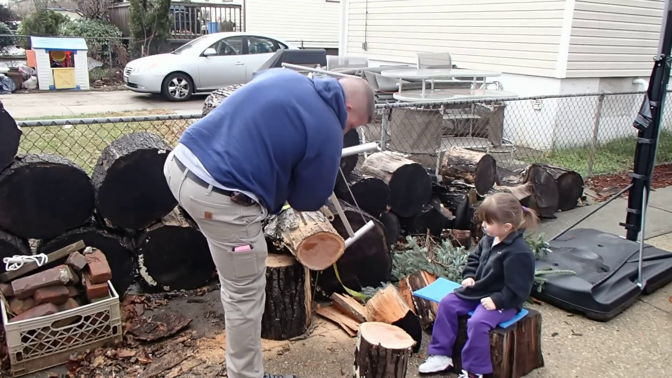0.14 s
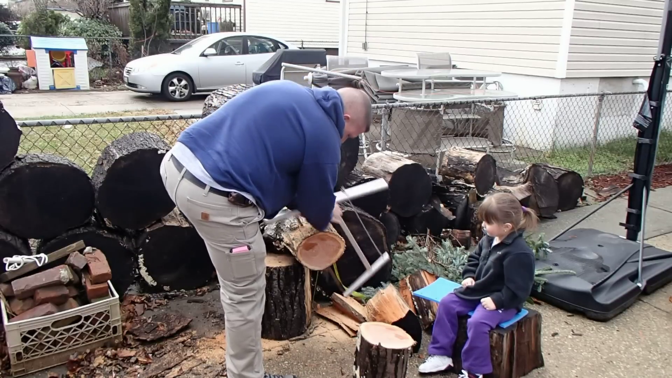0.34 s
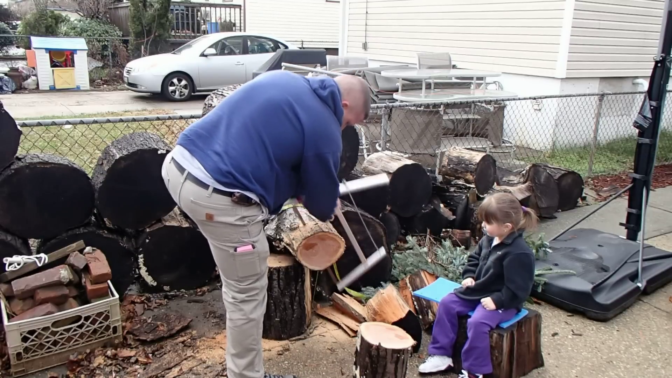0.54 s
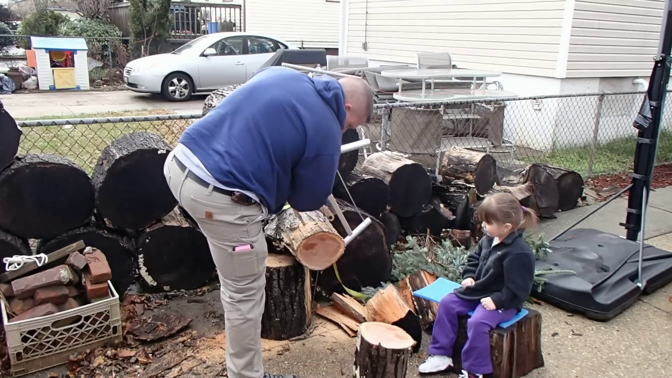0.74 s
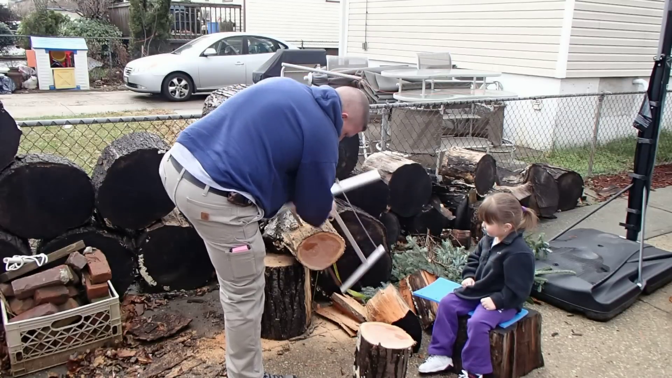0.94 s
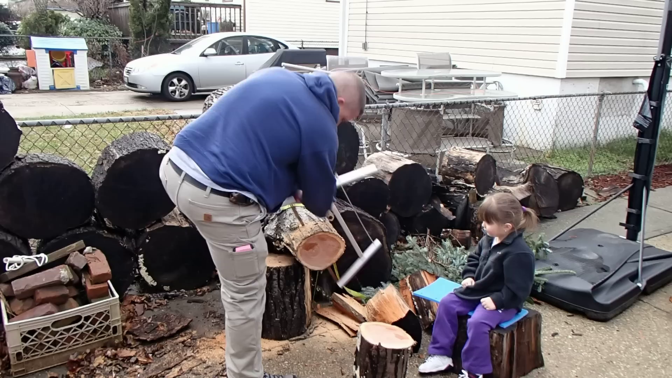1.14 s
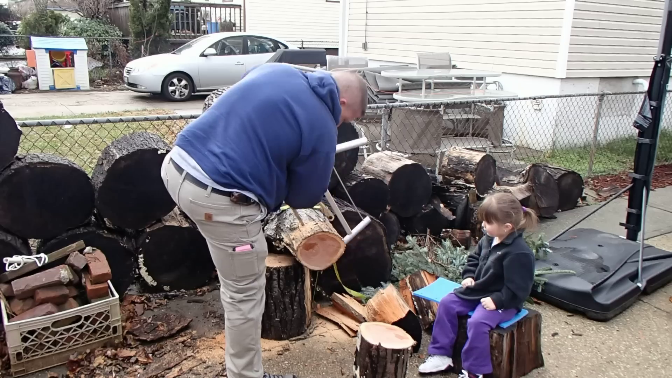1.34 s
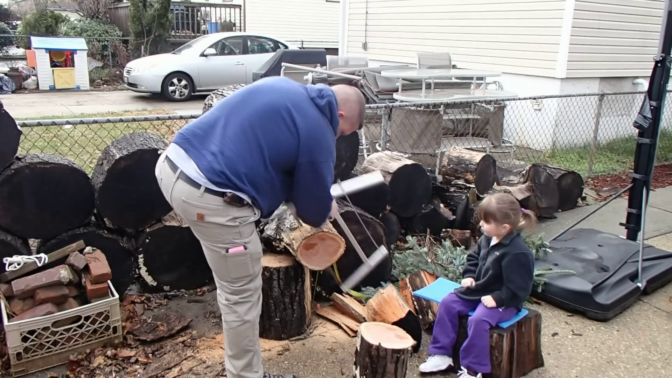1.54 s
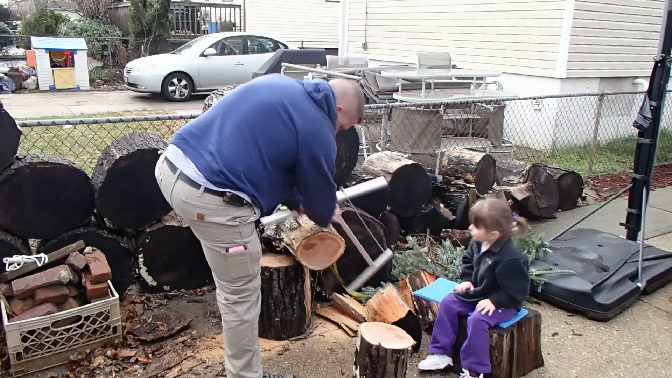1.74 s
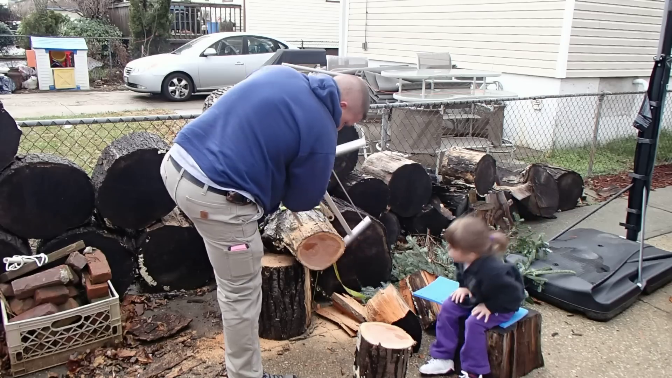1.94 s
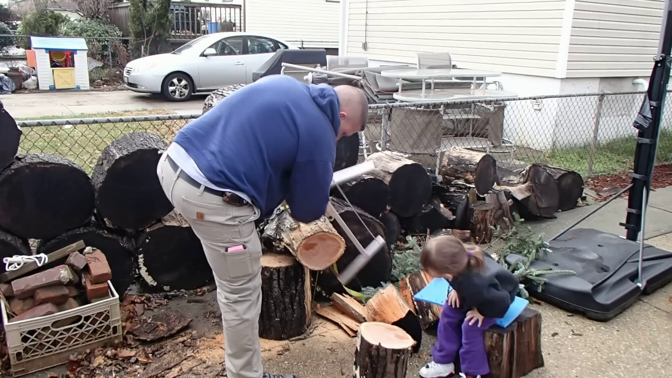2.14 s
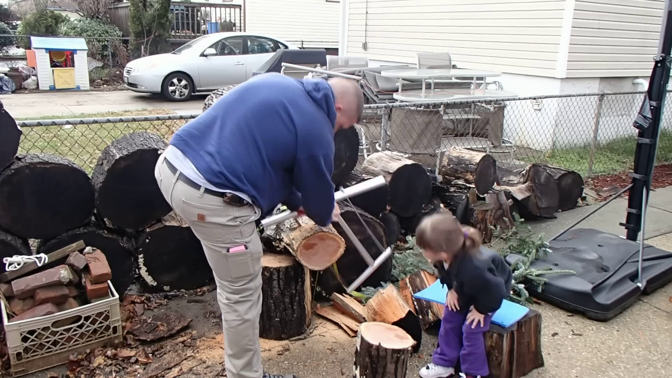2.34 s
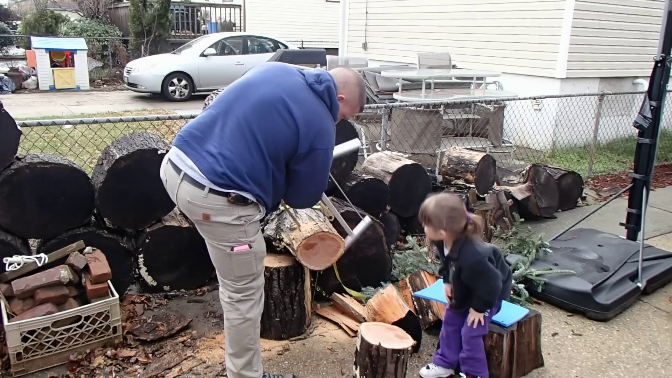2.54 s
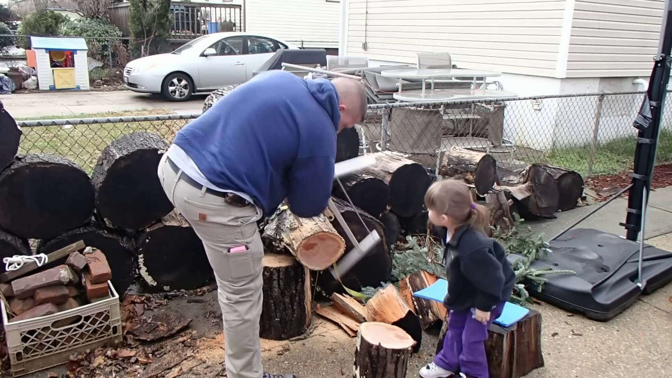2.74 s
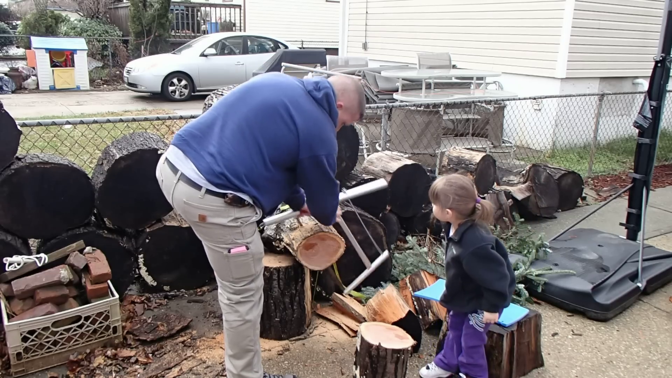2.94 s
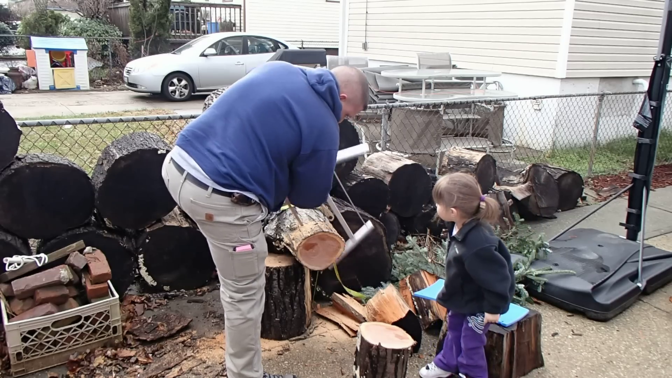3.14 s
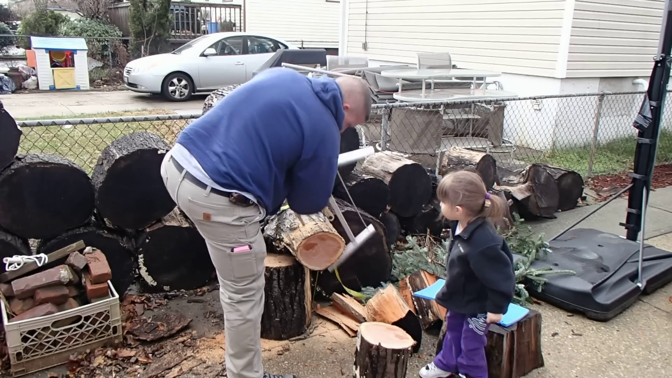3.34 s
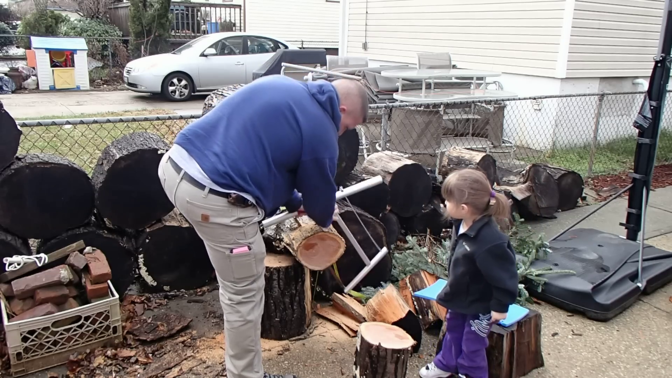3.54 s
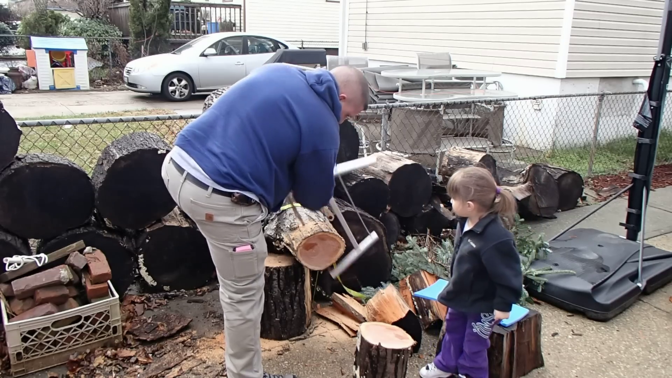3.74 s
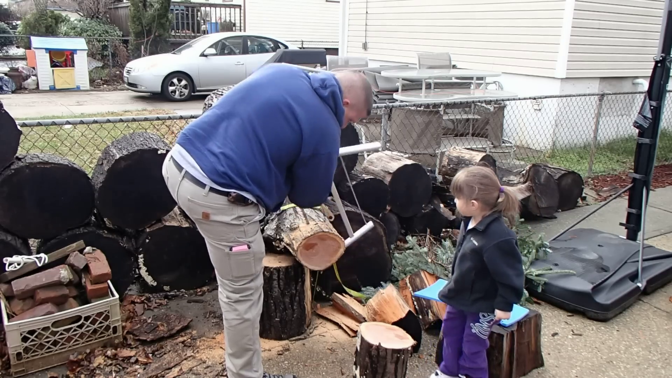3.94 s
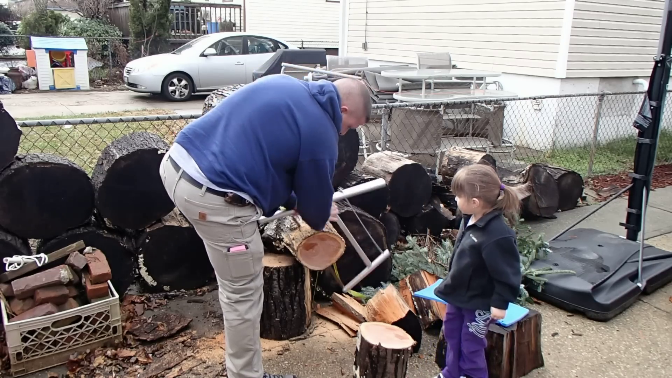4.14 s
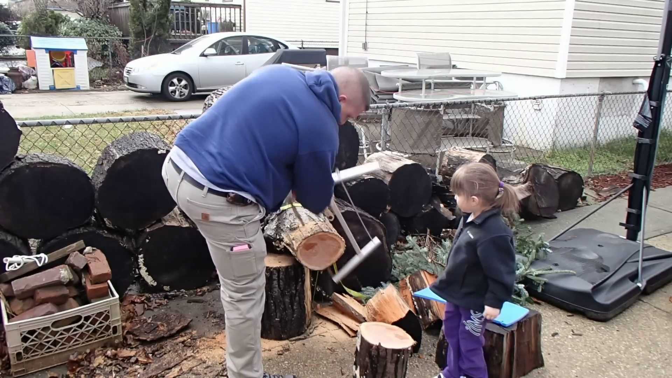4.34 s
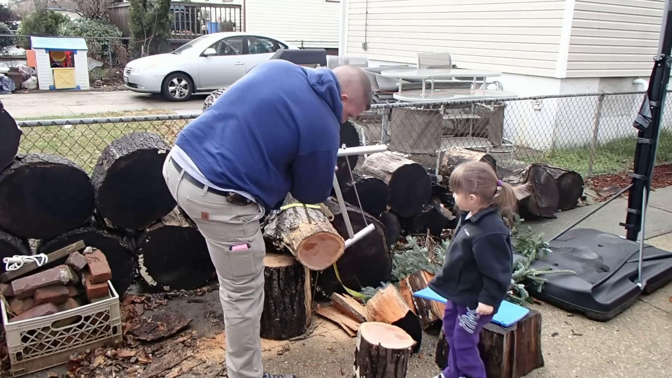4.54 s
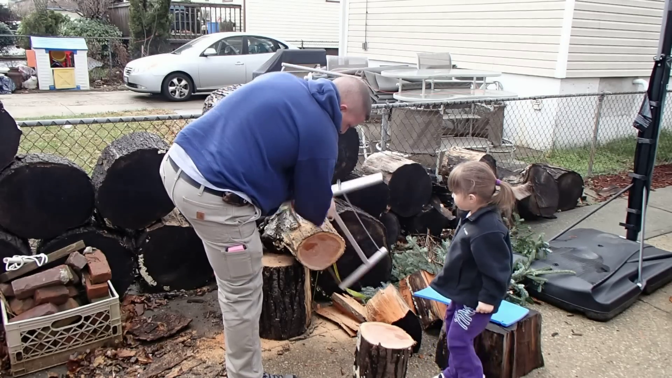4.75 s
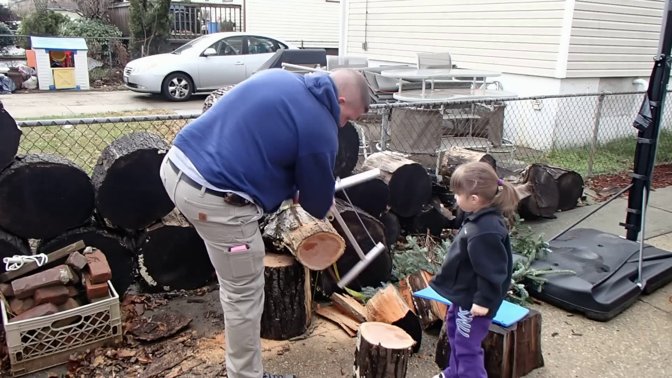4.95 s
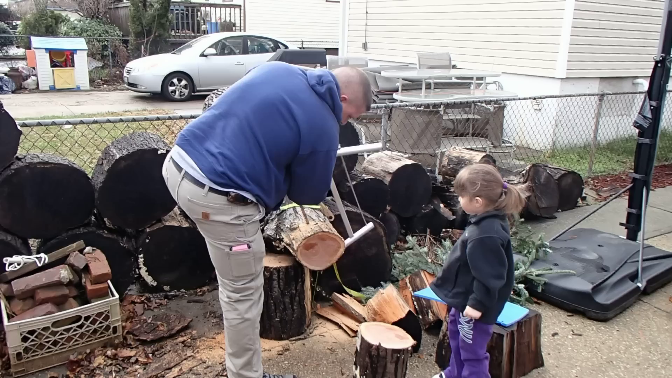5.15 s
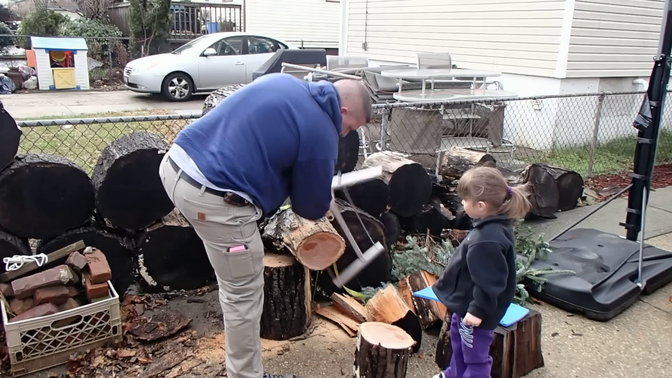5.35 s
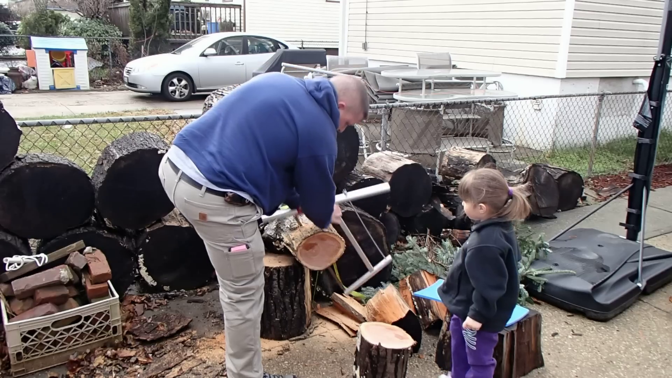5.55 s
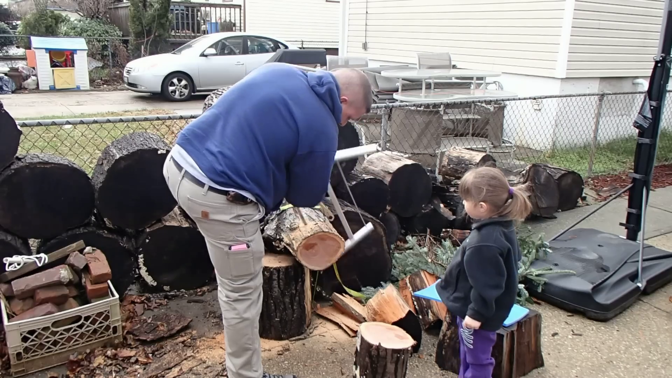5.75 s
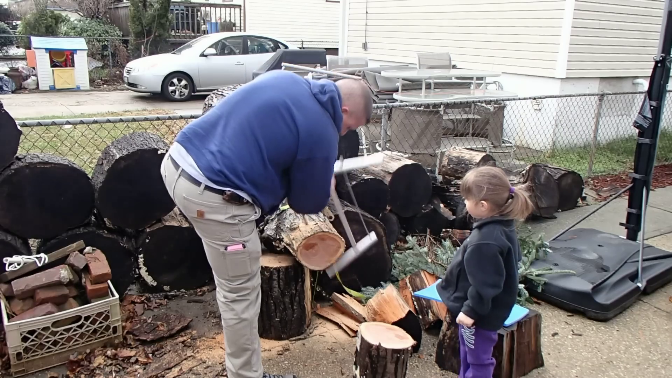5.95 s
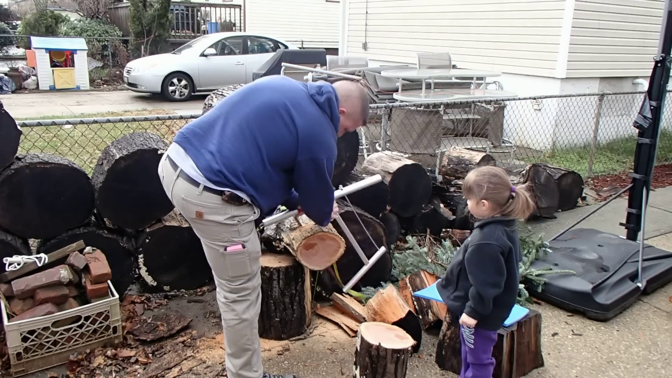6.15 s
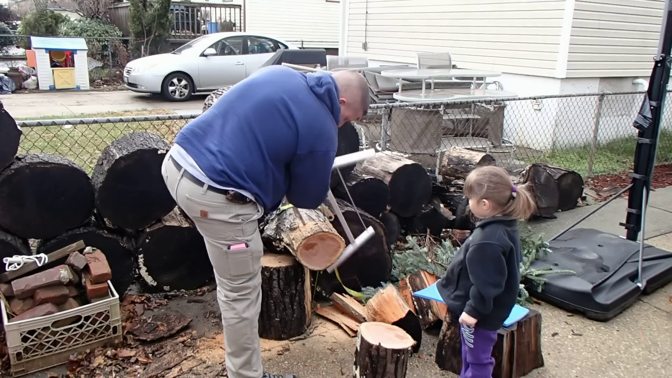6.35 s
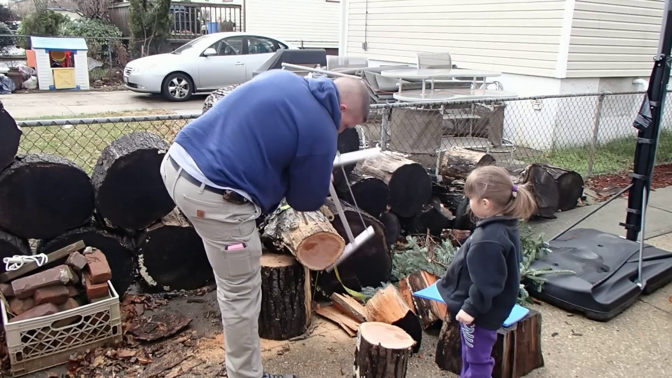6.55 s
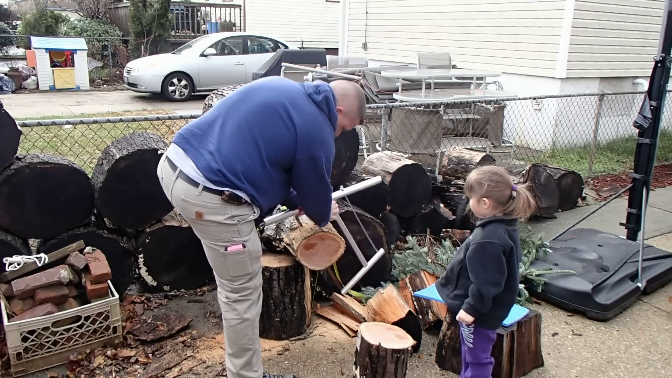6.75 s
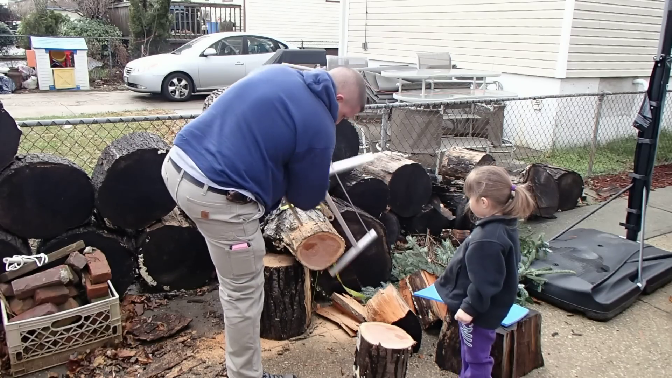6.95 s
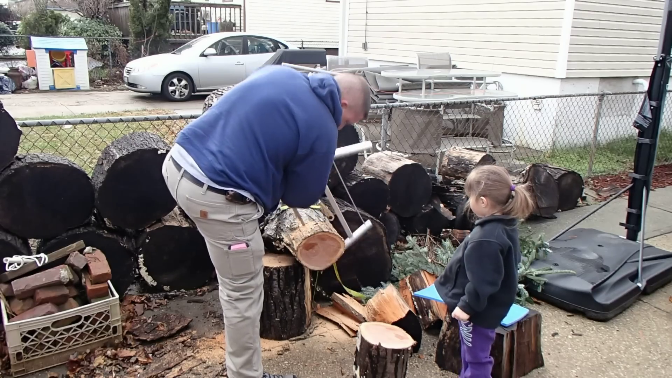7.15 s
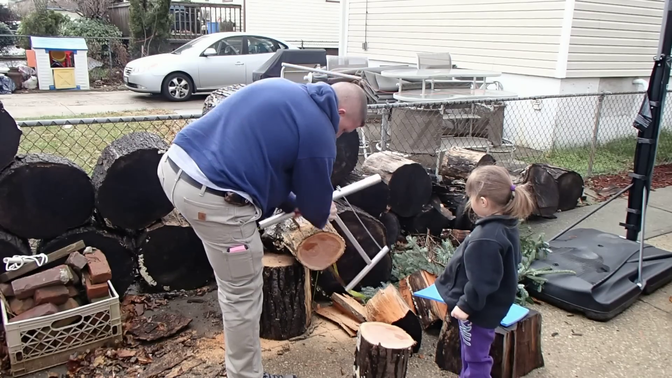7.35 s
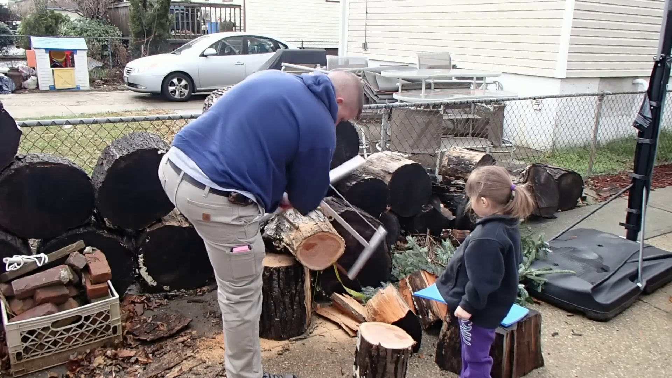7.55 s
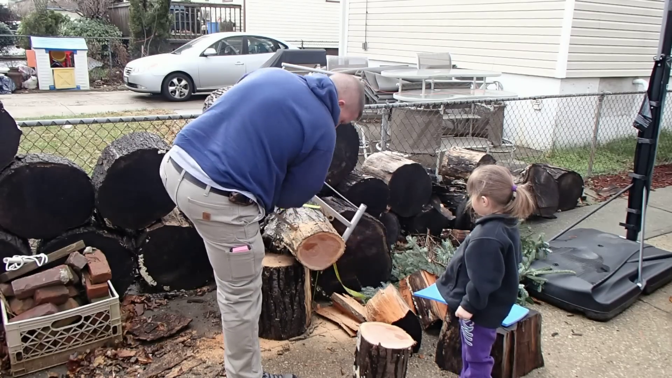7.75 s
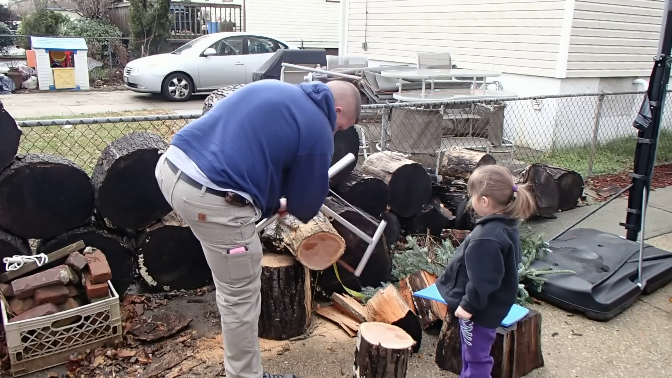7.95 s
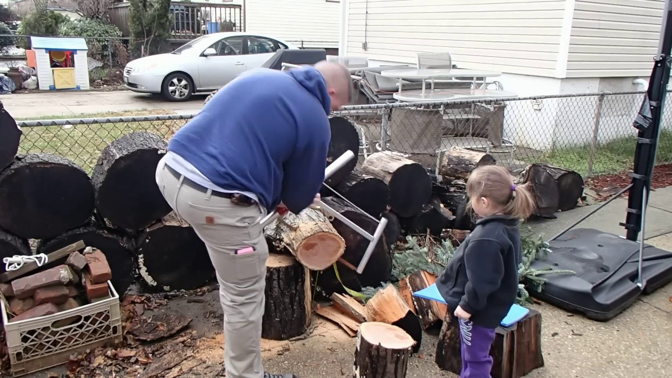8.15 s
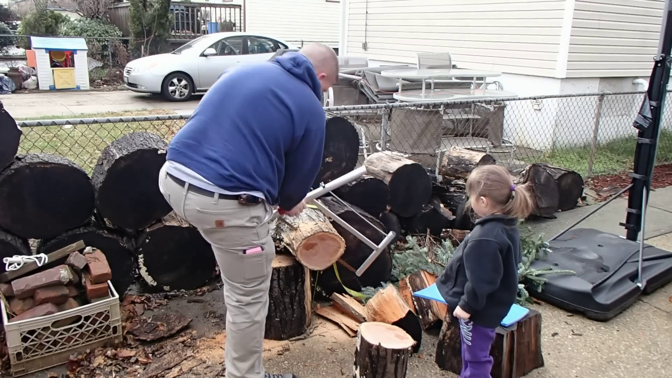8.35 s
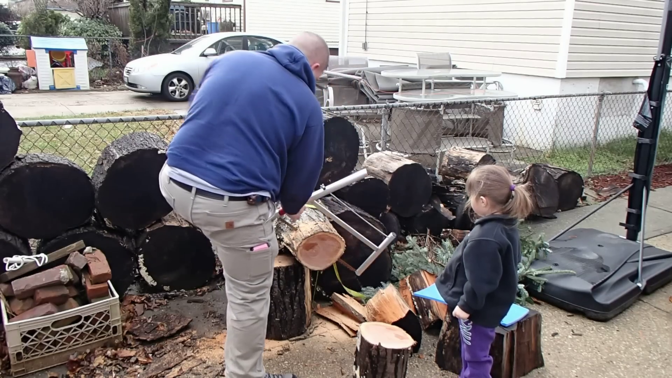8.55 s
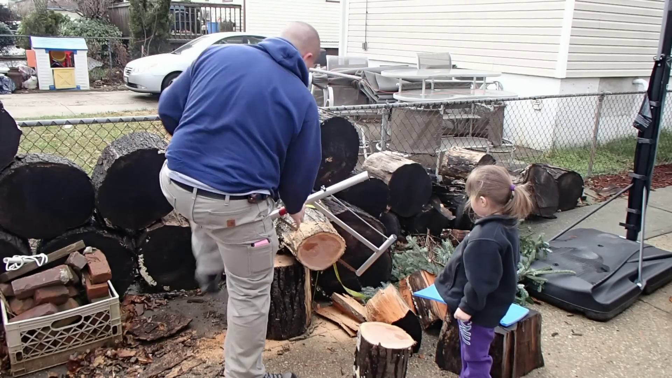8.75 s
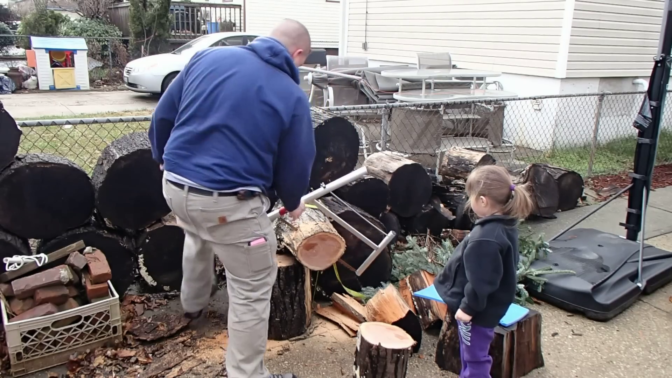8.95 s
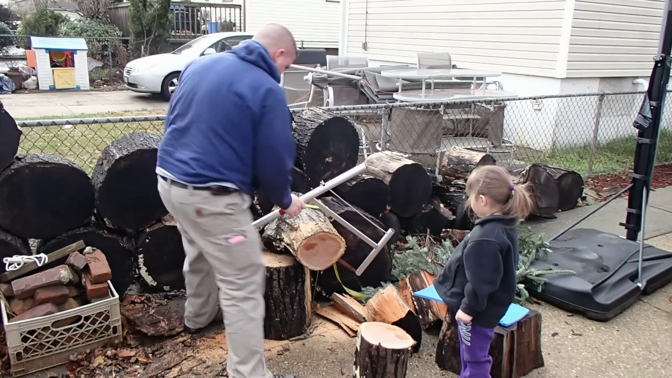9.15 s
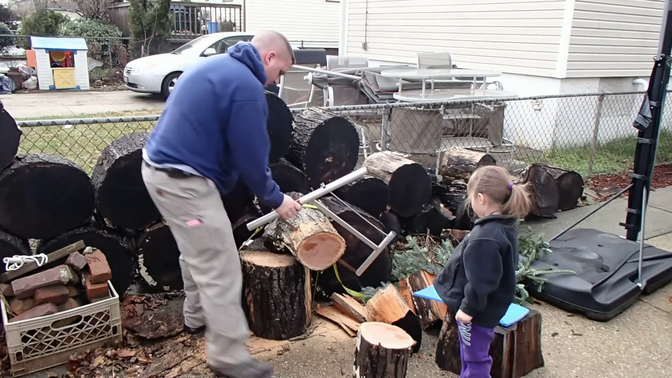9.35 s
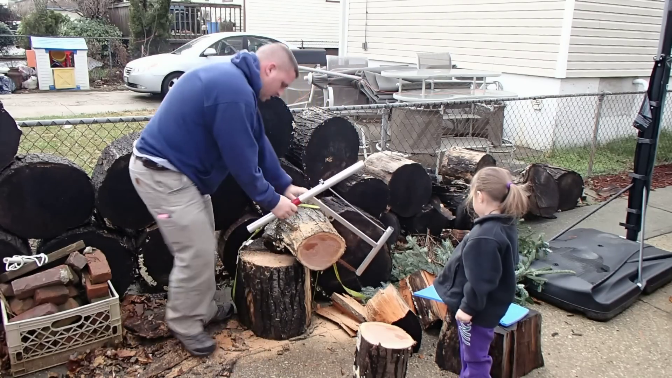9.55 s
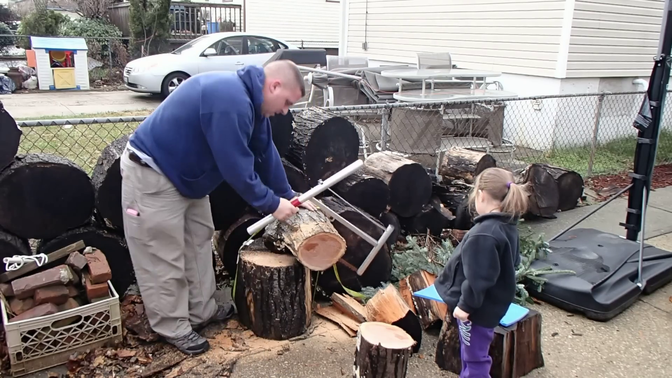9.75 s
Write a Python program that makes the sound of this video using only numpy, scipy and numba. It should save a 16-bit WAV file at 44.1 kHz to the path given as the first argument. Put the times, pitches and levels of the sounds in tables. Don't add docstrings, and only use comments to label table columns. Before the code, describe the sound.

A bow saw cuts a log a few metres from a small camera in a backyard. Loud, coarse push strokes alternate with much softer pulls, about three pushes every two seconds, with ringing blade, snags and splinter cracks. The sawing stops near eight seconds; the metal frame ticks lightly, shoes scuff gritty concrete and clothes rustle. One faint pull comes at the end over a low traffic hum.

```python
import sys
import numpy as np
from scipy import signal
from scipy.fft import rfft, irfft, next_fast_len
from scipy.io import wavfile
from scipy.ndimage import uniform_filter1d
from numba import njit

SR = 44100
rng = np.random.default_rng(int(sys.argv[2]) if len(sys.argv) > 2 else 0)


def transcribe(signal):
    frames = np.atleast_2d(signal).T
    limited = np.clip(frames, -1, 1)
    pcm = np.round(limited * 32767).astype(np.int16)
    wavfile.write(sys.argv[1], SR, pcm)


def voltage_ratio(level):
    return 10 ** (np.asarray(level, float) / 20)


N = 436149
T = np.arange(N) / SR

# frequency in Hz, density in dB per Hz.
TRAFFIC_COLOUR = [(15, -51), (25, -26), (70, -3.5), (102, -6), (194, -5.5), (284, -5.5), (352, -5),
                  (461, -15), (557, -11), (769, -9), (1930, -19), (3050, -24), (3300, -35.5), (15800, -33)]
# time in seconds, level in dB.
TRAFFIC_LEVEL = [(0.0, -53), (1.82, -52), (2.918, -55), (3.96, -52.5), (5.89, -53), (6.39, -49.5),
                 (6.86, -52), (8.43, -49), (9.89, -50.5)]
# time in seconds, level in dB.
RUSTLE = [(0, -59), (7.9, -45), (8.15, -44), (8.42, -49), (8.6, -46), (8.9, -47), (9.12, -42),
          (9.35, -45.5), (9.65, -42.5)]
# start in seconds, peak in dB, centre in Hz, T60 in seconds.
SCUFFS = [(8.147, -32, 5170, .05), (8.265, -40, 3700, 0.14), (8.530, -34, 3400, 0.043),
          (8.678, -30, 4670, 0.023), (9.012, -35, 4400, .12), (9.021, -36, 3800, .12),
          (9.135, -36, 3744, .06), (9.158, -27, 4600, .04), (9.167, -31, 4000, 0.098),
          (9.191, -29, 3000, 0.044), (9.203, -32, 4500, .07), (9.46, -39, 8800, .03),
          (9.540, -31, 3480, 0.128), (9.549, -28, 4450, 0.13), (9.575, -44, 4600, .1)]
# frequency in Hz, peak in dB, T60 in seconds.
FRAME_TICK = [(2980, -50, 0.26), (5400, -46.5, 0.074), (6420, -55, .15), (4900, -52, .07)]
# start in seconds, peak in dB.
JOLTS = [(.255, -31), (.885, -30), (1.47, -20.5), (2.29, -31), (2.49, -32), (2.735, -37.5), (3.39, -37),
         (3.69, -34), (4.06, -30), (4.68, -19.5), (5.32, -22), (5.67, -31), (5.955, -19), (6.545, -21),
         (7.63, -34.5), (7.84, -33)]
# time in seconds, peak in dB.
SKIPS = [
    (4.5950, -9),
    (4.6013, -3),
    (4.6068, -2),
    (4.6150, -8),
    (4.6256, -16),
]
# start in seconds,
# peak in dB, lowest frequency in Hz.
SPLINTERS = [(1.258, -36, 6000), (1.292, -40, 7900), (2.544, -20, 600), (4.5999, -28, 3000),
             (5.105, -38.5, 5999), (5.476, -31, 2000), (5.74, -37, 6000), (6.0826, -29, 4500),
             (6.757, -35, 3000), (7.005, -33, 6000), (8.678, -41, 2500), (9.46, -48, 7000)]
# start, fastest and end in seconds, cutting level in dB, log thud in dB re the cut.
PUSHES = [(0.139, 0.278, 0.37, -13, -24.5), (0.751, 0.866, 0.99, -14.5, -26),
          (1.344, 1.482, 1.617, -15.5, -24.5), (1.977, 2.095, 2.233, -15.5, -20.5),
          (2.601, 2.753, 2.857, -13.5, -18), (3.247, 3.367, 3.475, -15, -17),
          (3.898, 4.029, 4.127, -15, -21.5), (4.553, 4.671, 4.781, -13.5, -20),
          (5.188, 5.296, 5.424, -14, -22), (5.821, 5.942, 6.06, -14.5, -26),
          (6.472, 6.567, 6.68, -15.5, -38), (7.068, 7.184, 7.335, -18, -32), (7.71, 7.858, 7.94, -17, -38)]
# start, fastest and end in seconds, cutting level in dB, squareness of the swell.
PULLS = [(-.1, -0.032, 0.098, -32.5, 2.5), (0.389, 0.55, 0.74, -29, 2.86),
         (1.018, 1.15, 1.317, -28.5, 3.15), (1.605, 1.801, 1.977, -25, 2.37),
         (2.26, 2.406, 2.58, -29.5, 3.8), (2.85, 3.053, 3.22, -26, 2.12), (3.52, 3.722, 3.88, -27, 2.13),
         (4.169, 4.35, 4.495, -26.5, 2.27), (4.835, 4.984, 5.152, -26.5, 2.6),
         (5.442, 5.647, 5.79, -26, 2.45), (6.097, 6.277, 6.44, -27, 2.25), (6.744, 6.927, 7.06, -25.5, 2.7),
         (7.4, 7.53, 7.77, -30, 3.1), (9.69, 9.87, 9.95, -30.5, 1.63)]
PUSH_EARLY_DB = {"log": -11.5, "frame": 1.5, "edge": -1}
PUSH_LATE_DB = {"log": 1, "frame": 5.5, "edge": 2.5}
PULL_EARLY_DB = {"log": 0, "frame": 4.5, "edge": 6}
PULL_LATE_DB = {"log": -9.5, "frame": 3, "edge": -1}
# start in seconds, peak in dB, T60 in seconds.
SNAGS = [(0.0558, -21, 0.051), (0.165, -10, 0.038), (.2034, -11, .1), (0.264, -3, 0.082),
         (0.4184, -25, 0.078), (0.5316, -9, 0.041), (0.7866, -19, 0.09), (0.915, -1.5, 0.052),
         (1.0575, -19, 0.12), (1.12, -13, 0.063), (1.6596, -16, 0.16), (2.0647, -6, 0.049),
         (2.287, -16, 0.13), (2.3032, -2, 0.048), (2.5434, -13.5, 0.055), (3.2824, -19, 0.046),
         (3.548, -25.5, 0.07), (3.9508, -24, 0.051), (4.034, -1, 0.086), (4.5446, -26, 0.059),
         (4.598, -12, .08), (4.892, -15.5, .06), (5.1946, -16, 0.033), (5.236, -16, 0.12),
         (5.295, -12, 0.038), (5.4922, -14, .09), (6.5243, -12, 0.14), (6.8, -21, .1), (7.0795, -26, 0.067),
         (7.444, -27, 0.084)]
# frequency in Hz, width in Hz, level in dB.
BODY_MODES = [(1018, 94, -9.5), (1177, 28, -4), (1784, 105, -7.5), (2353, 51, -8.5), (3250, 25, -8.5),
              (3793, 126, 2), (4394, 132, 0.5), (5305, 153, -1), (6830, 33, -23), (6960, 120, -15),
              (7680, 170, -14), (9250, 210, -21.5), (9700, 890, -33), (11160, 310, -16), (11970, 190, -20),
              (12450, 280, -35), (12560, 320, -15.5), (13900, 700, -25), (14500, 580, -12.5),
              (460, 70, -16), (752, 31, -7.5), (864, 38, -6.5), (1246, 50, -2), (1705, 50, -8.5),
              (1892, 38, -5), (2753, 24, -6.5), (3390, 16, 0), (4010, 89, -3.5), (4187, 61, 0),
              (5610, 40, -5.5), (5513, 40, -23.5), (8090, 104, -11.5), (15300, 630, -14.5)]
# frequency in Hz, level in dB.
BLADE_RINGS = [(735, -59.5), (1147, -47), (1812, -52.5), (2303, -53), (3204, -47.5), (3590, -50.5),
               (3770, -62), (4441, -48), (5258, -67), (7025, -62), (7737, -56), (8350, -71)]
# frequency in Hz, density in dB per Hz.
FIBRE_COLOUR = [(150, -29), (250, -18), (575, -19.5), (1050, 1), (1450, -2.5), (1900, 2), (2600, 0.5),
                (4300, -7), (5390, -2.5), (6410, -11), (8700, -26), (10400, -32.5), (14700, -11.5),
                (15800, -10)]

LOG_TOP_HZ, FRAME_TOP_HZ, EDGE_HZ = 650, 2700, 6800
STROKE_DEPTH_DB = 30
PUSH_FRAME_DB, PUSH_EDGE_DB = -7, -11
PULL_LOG_DB, PULL_FRAME_DB, PULL_EDGE_DB = -26, -5.5, -13
PUSH_RISE, PUSH_FALL = 1.5, 1.43


def set_rms(x, db):
    return x * voltage_ratio(db) / np.sqrt(np.mean(x ** 2))


@njit
def sweep_filter(x, hz, width):
    y, band_state, low_state = np.empty(len(x)), 0., 0.
    for i in range(len(x)):
        g = np.pi * hz[i]
        k = width / hz[i]
        v = (band_state + g * (x[i] - low_state)) / (1 + g * (g + k))
        band_state = 2 * v - band_state
        low_state = low_state + 2 * g * v
        y[i] = k * v
    return y


def resonance(x, hz, width_hz):
    safe_hz = np.minimum(hz, .45 * SR)
    warped = np.tan(np.pi * safe_hz / SR) / np.pi * np.ones(N)
    return sweep_filter(x, warped, width_hz / np.mean(hz) * warped.mean())


def walk(rate_hz):
    hold = int(SR / rate_hz)
    steps = np.repeat(rng.standard_normal(N // hold + 1), hold)
    return 1.3 * uniform_filter1d(uniform_filter1d(steps, hold), hold)[:N]


def slices(x, colour, step):
    hz, db = np.transpose(colour)
    size = next_fast_len(N)
    octave = np.log2(np.fft.rfftfreq(size, 1 / SR) + 1)
    shaped = rfft(x, size) * voltage_ratio(np.interp(octave, np.log2(hz), db))
    for centre in np.arange(np.log2(hz[0]), np.log2(hz[-1]) + step, step):
        weight = np.maximum(1 - abs(octave - centre) / step, 0)
        yield 2 ** centre, irfft(shaped * weight, size)[:N]


def add_hit(track, at, db, t60, rise):
    start = int(at * SR)
    dt = T[:min(SR // 2, N - start)]
    decay = np.exp(-np.log(1000) * dt / max(t60, .003))
    track[start:start + len(dt)] += voltage_ratio(db) * (1 - np.exp(-dt / rise)) * decay
    return track


def teeth(bites_hz, scatter_db, dust_db):
    chance = rng.random(N) < bites_hz / SR
    depth = np.minimum(rng.exponential(size=N), 3)
    bites = chance * voltage_ratio(scatter_db * depth) * rng.choice([-1., 1.], N)
    dust = rng.standard_normal(N)
    return set_rms(set_rms(bites, 0) + set_rms(dust, dust_db), 0)


def yard():
    s, db = np.transpose(TRAFFIC_LEVEL)
    passing_db = np.interp(T, s, db) - np.mean(db)
    swell, traffic = walk(0.67), 0
    for hz, part in slices(rng.standard_normal(N), TRAFFIC_COLOUR, 2 / 3):
        bass = np.clip(1.3 - hz / 400, 0, 1)
        flicker = 1.5 * walk(6) + .6 * swell
        traffic = traffic + part * voltage_ratio(bass * (passing_db + flicker))
    rustle_db = np.interp(T, *np.transpose(RUSTLE))
    cloth = rng.standard_normal(N) * voltage_ratio(rustle_db + 2.1 * walk(40))
    cloth = resonance(cloth, 3650.0, 520.0) + resonance(cloth, 4500.0, 520.0)
    drone = resonance(rng.standard_normal(N), 100 + 4 * walk(2.5), 2.7) * voltage_ratio(2.6 * passing_db)
    return set_rms(traffic, -44.0) + set_rms(drone, -57.5) + cloth


def walls(x, t60, wet_db):
    t = np.arange(SR // 2) / SR
    tail = rng.standard_normal(len(t)) * np.exp(-np.log(1000) * t / t60) * (t > .008)
    tail = signal.lfilter([1], [1, -.45], tail)
    return voltage_ratio(wet_db) * signal.fftconvolve(x, tail / np.sqrt(np.sum(tail ** 2)))[:N]


def scuffs():
    grit = teeth(bites_hz=925, scatter_db=3.0, dust_db=-1)
    out = 0
    for t, db, hz, t60 in SCUFFS:
        crunch = grit * add_hit(np.zeros(N), t, db - 2.5, t60, .0008)
        body = resonance(resonance(crunch, 2600.0, 2700.0), 2600.0, 4070.0)
        treble = resonance(crunch, 13750.0, 2500.)
        out = out + resonance(crunch, hz, 601.0) + voltage_ratio(2) * body + voltage_ratio(-7.5) * treble
    return out


def frame_tick():
    out = np.zeros(N)
    for hz, db, t60 in FRAME_TICK:
        out += add_hit(np.zeros(N), 8.148, db, t60, .0005) * np.sin(2 * np.pi * hz * T)
    return out


def blade_song():
    swing = np.zeros(N)
    for t, db in JOLTS:
        add_hit(swing, t, db + 5.0, t60=0.26, rise=.012)
    return swing * np.sin(2 * np.pi * np.cumsum(3590 + 3 * walk(14)) / SR)


def tooth_skips():
    clicks = np.zeros(N)
    for t, db in SKIPS:
        clicks[int(t * SR)] = voltage_ratio(db + 20)
    return resonance(resonance(clicks, 4300.0, 2100.0), 3600.0, 3000.0)


def splinters():
    out = np.zeros(N)
    for t, db, low_hz in SPLINTERS:
        crack = rng.standard_normal(N) * add_hit(np.zeros(N), t, db, t60=.04, rise=.0005)
        bright = signal.butter(1, (low_hz, low_hz + 3500), "band", fs=SR, output="sos")
        out += signal.sosfilt(bright, crack)
    return out


def stroke(start, fastest, end, db, rise, fall):
    span = np.where(T < fastest, max(fastest - start, .02), max(end - fastest, .02))
    progress = (T - fastest) / span
    away = np.minimum(abs(progress), 3)
    swell = voltage_ratio(db - STROKE_DEPTH_DB * away ** np.where(progress < 0, rise, fall))
    return swell, np.clip(progress, -1, 1)


def strokes():
    push_rest = (PUSH_FRAME_DB, PUSH_EDGE_DB, PUSH_RISE, PUSH_FALL, PUSH_EARLY_DB, PUSH_LATE_DB)
    rows = [(*row, *push_rest) for row in PUSHES]
    for *row, square in PULLS:
        shares = (PULL_LOG_DB, PULL_FRAME_DB, PULL_EDGE_DB)
        rows.append((*row, *shares, square, square, PULL_EARLY_DB, PULL_LATE_DB))
    power, colour = 0, 0
    for start, fastest, end, db, log_db, frame_db, edge_db, rise, fall, early, late in rows:
        swell, progress = stroke(start, fastest, end, db, rise, fall)
        early_db, late_db = np.c_[list(early.values())], np.c_[list(late.values())]
        drift = np.where(progress < 0, early_db, late_db) * abs(progress)
        power = power + swell ** 2
        colour = colour + swell ** 2 * (np.c_[[log_db, frame_db, edge_db]] + drift)
    return np.sqrt(power), *(colour / power)


def saw():
    push, log_db, frame_db, edge_db = strokes()
    for t, db, t60 in SNAGS:
        add_hit(push, t, db - 12.5, t60, rise=0.0016)
    push = push * voltage_ratio(0.86 * walk(45) + 1.6 * walk(160))

    def share(hz):
        if hz < LOG_TOP_HZ:
            return voltage_ratio(log_db + 23)
        if hz < FRAME_TOP_HZ:
            return voltage_ratio(frame_db + 4.39)
        return voltage_ratio(0 * T) if hz < EDGE_HZ else voltage_ratio(edge_db + 11)

    forces = [push * teeth(bites_hz=2633.6, scatter_db=2.5, dust_db=-1.0) for _ in range(4)]
    out = 0
    for k, (hz, width, db) in enumerate(sorted(BODY_MODES)):
        drift_hz = (14 + 0.0049 * hz) * walk(11)
        drive = forces[k % 3] * share(hz) * voltage_ratio(3.76 * walk(22 + hz / 400))
        out = out + voltage_ratio(db + 10.5) * resonance(drive, hz + drift_hz, width)
    for hz, db in BLADE_RINGS:
        drive = forces[2] * share(hz) * voltage_ratio(5.1 * walk(14))
        out = out + voltage_ratio(db + 54) * resonance(drive, hz, 20 + 0.0037 * hz)
    for hz, fibres in slices(forces[3], FIBRE_COLOUR, 1 / 2):
        out = out + share(hz) * voltage_ratio(2.0 + 2.3 * walk(35)) * fibres
    return out + splinters() + tooth_skips() + blade_song()


def scene():
    near = saw() + scuffs() + frame_tick()
    return (near + walls(near, t60=0.093, wet_db=-18) + yard())[None]


def band_limit(x):
    return signal.sosfilt(signal.butter(12, 16800, fs=SR, output="sos"), x)


def record(dry):
    rounded = np.tanh(1.075 * dry) / 1.234
    top_cut = signal.ellip(12, .2, 70, 15670, fs=SR, output="sos")
    return band_limit(signal.sosfilt(top_cut, rounded))


dry = scene()
out = record(dry)
transcribe(out)
```